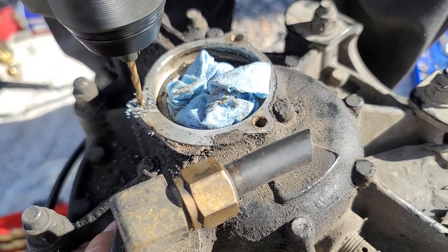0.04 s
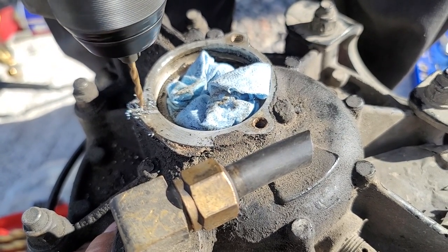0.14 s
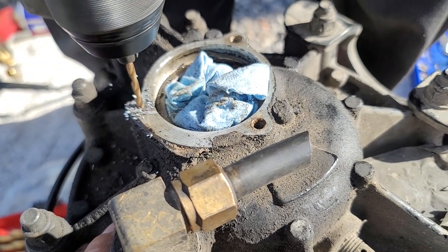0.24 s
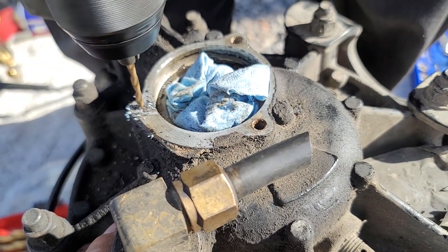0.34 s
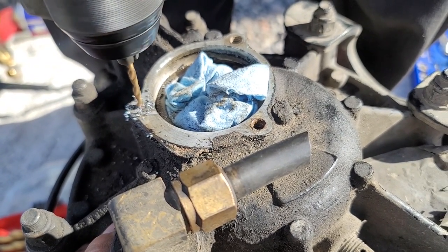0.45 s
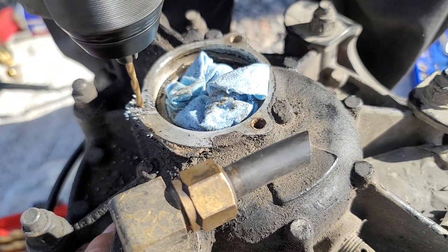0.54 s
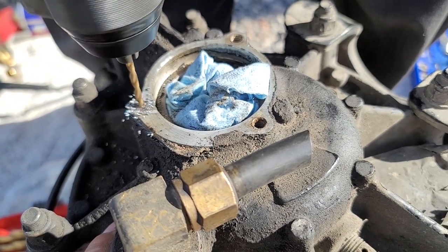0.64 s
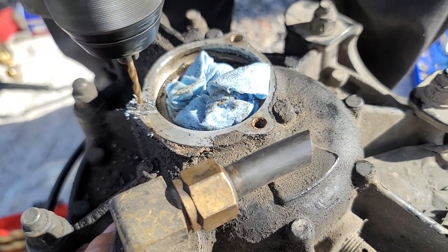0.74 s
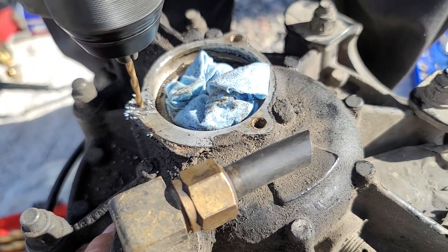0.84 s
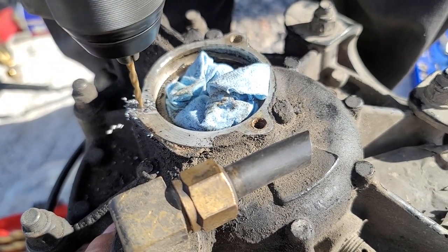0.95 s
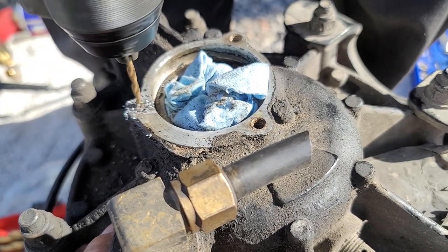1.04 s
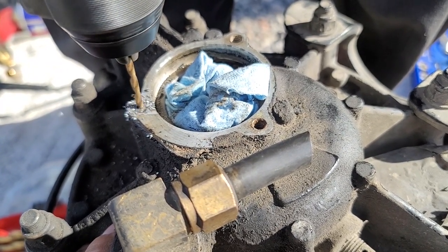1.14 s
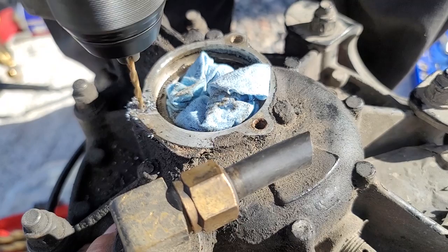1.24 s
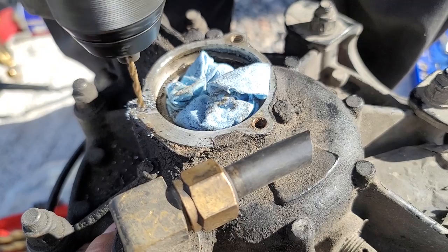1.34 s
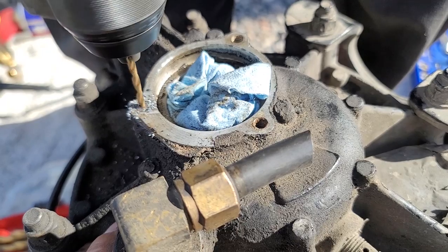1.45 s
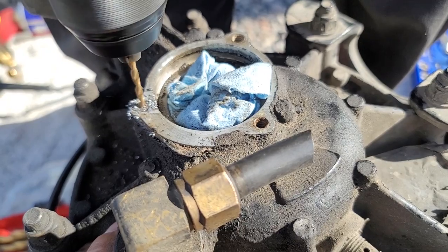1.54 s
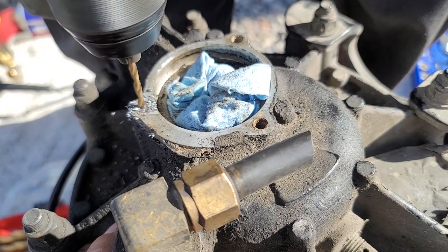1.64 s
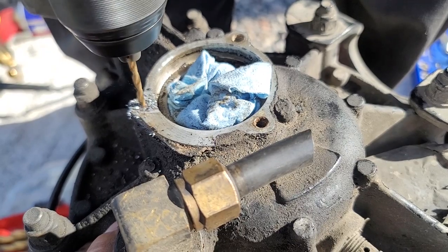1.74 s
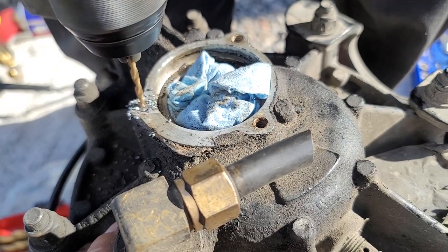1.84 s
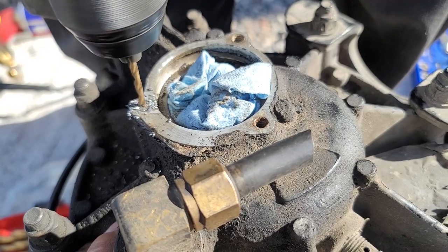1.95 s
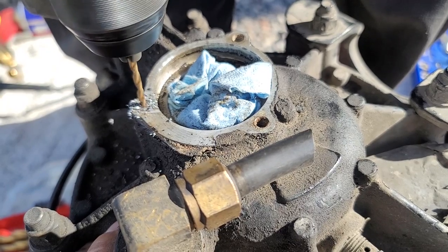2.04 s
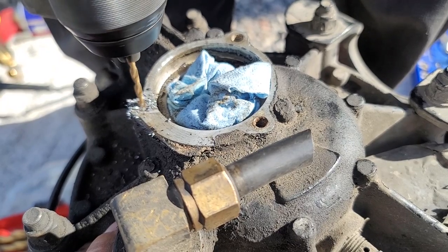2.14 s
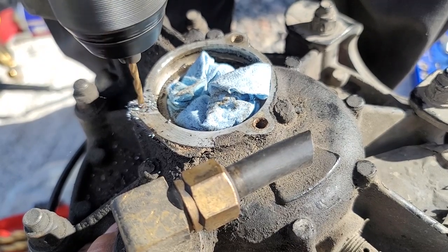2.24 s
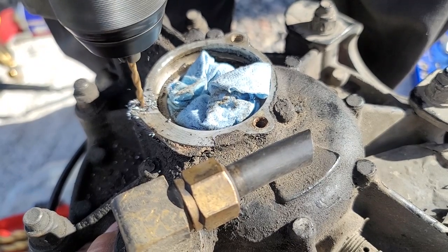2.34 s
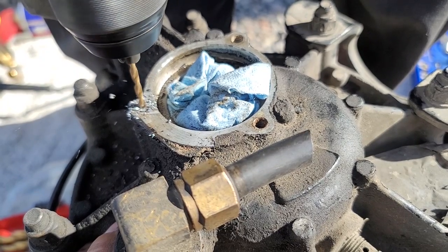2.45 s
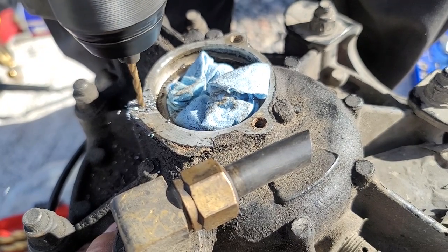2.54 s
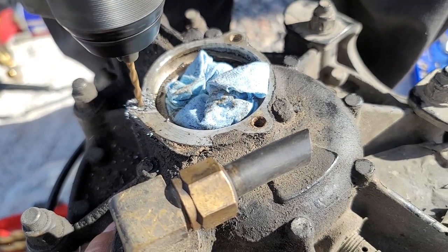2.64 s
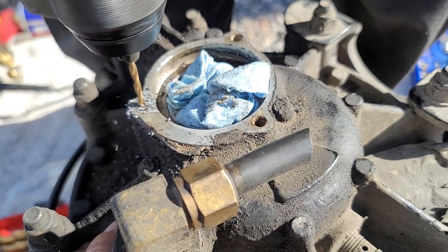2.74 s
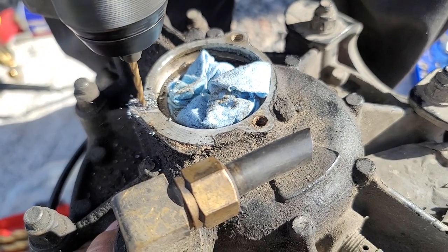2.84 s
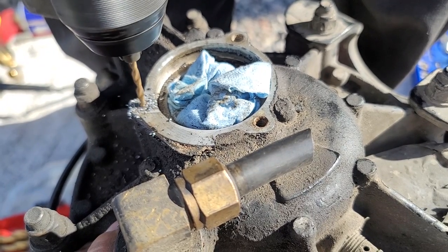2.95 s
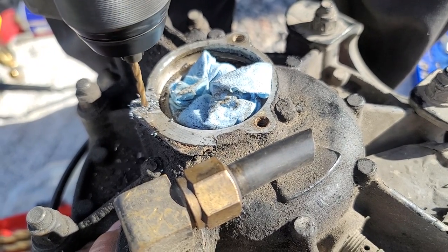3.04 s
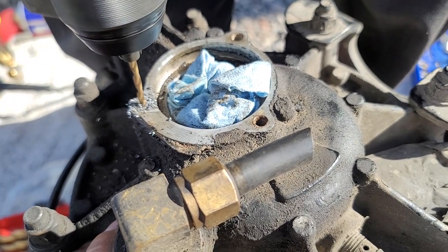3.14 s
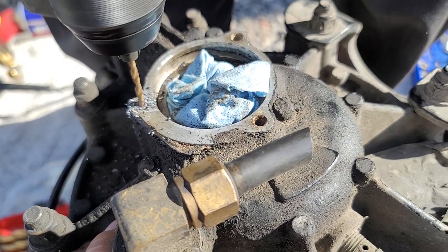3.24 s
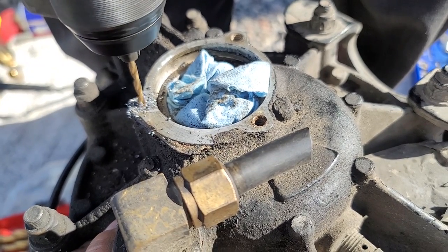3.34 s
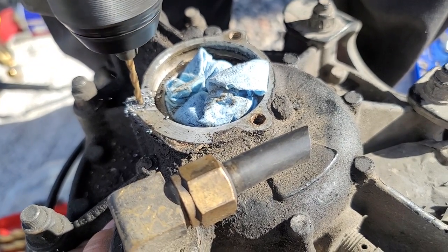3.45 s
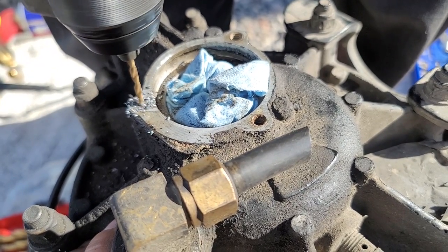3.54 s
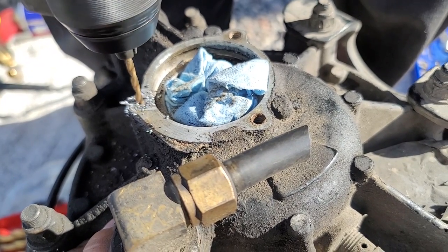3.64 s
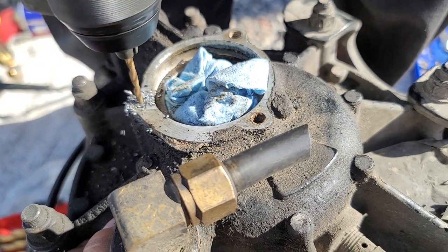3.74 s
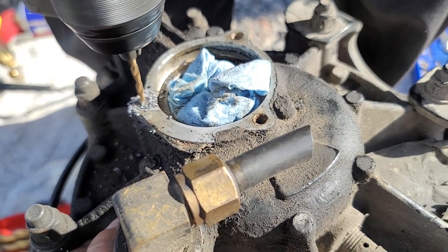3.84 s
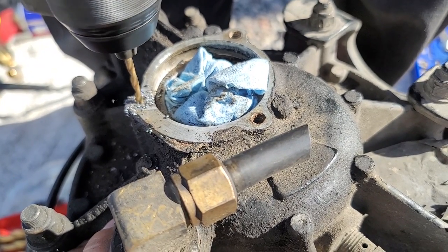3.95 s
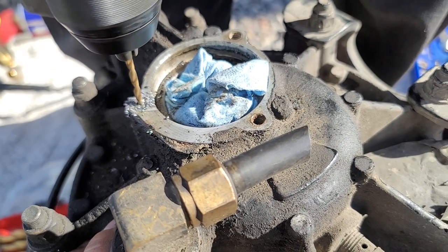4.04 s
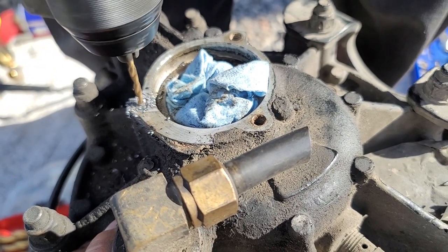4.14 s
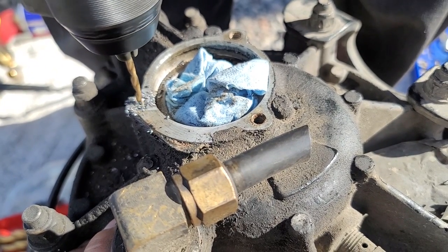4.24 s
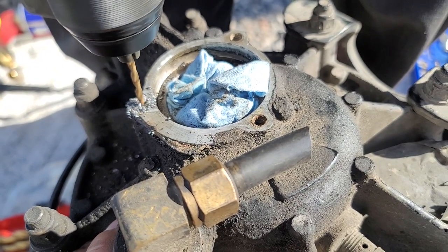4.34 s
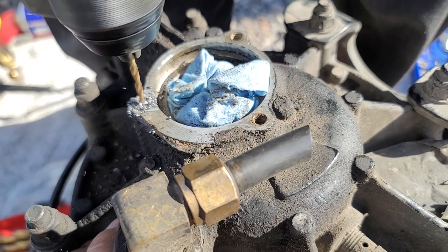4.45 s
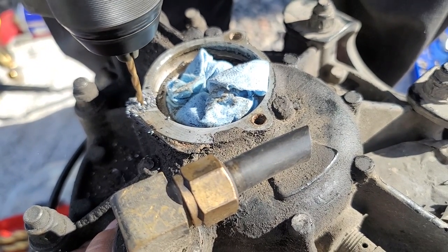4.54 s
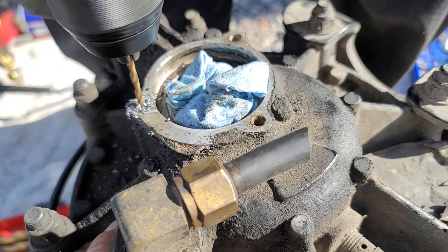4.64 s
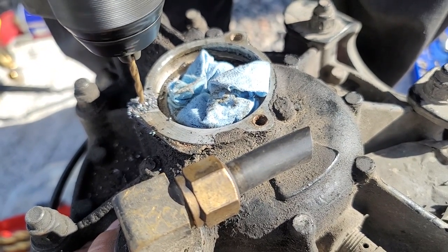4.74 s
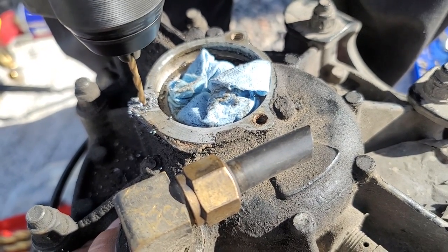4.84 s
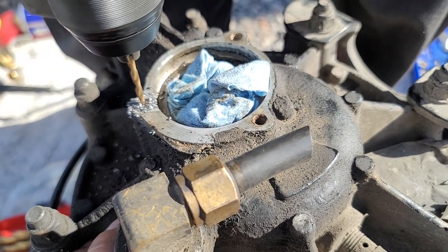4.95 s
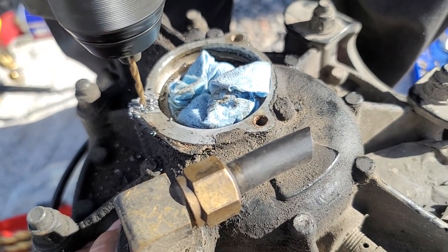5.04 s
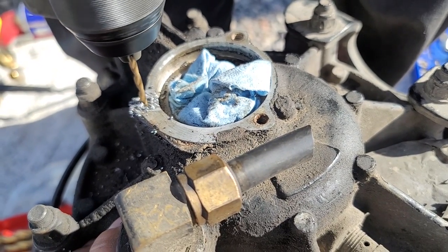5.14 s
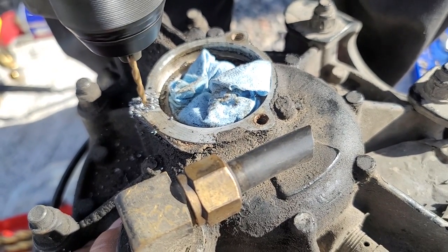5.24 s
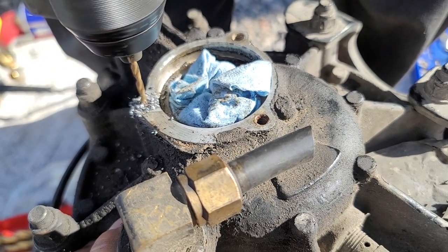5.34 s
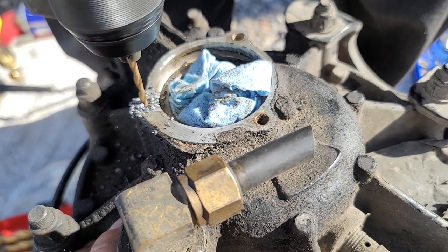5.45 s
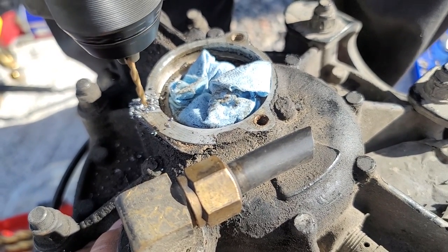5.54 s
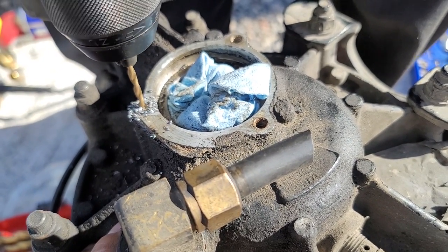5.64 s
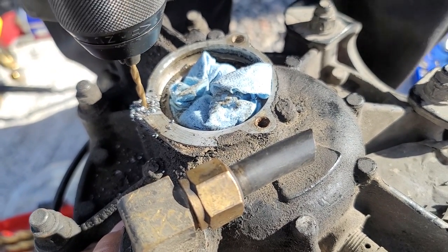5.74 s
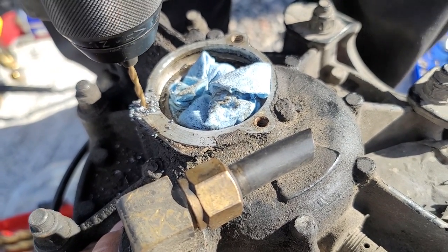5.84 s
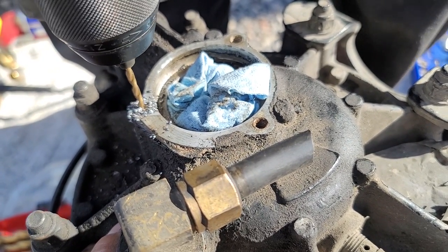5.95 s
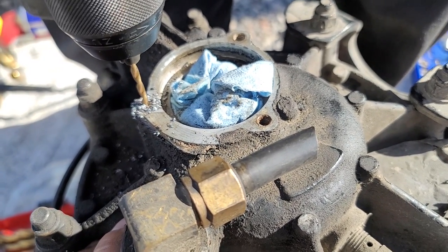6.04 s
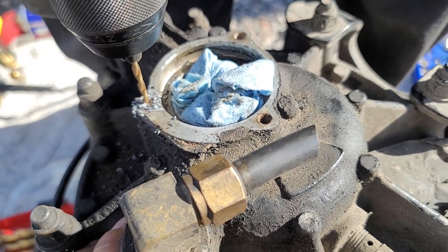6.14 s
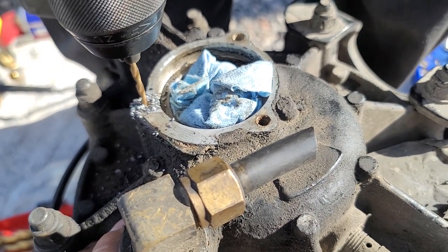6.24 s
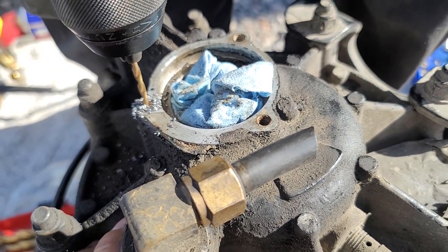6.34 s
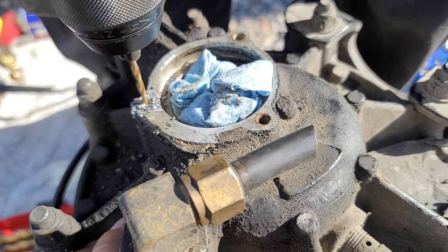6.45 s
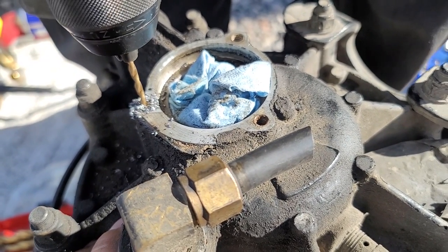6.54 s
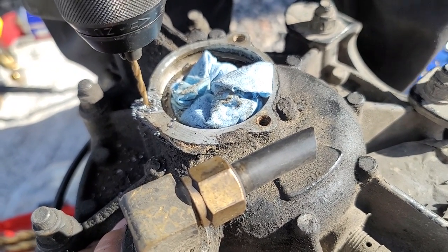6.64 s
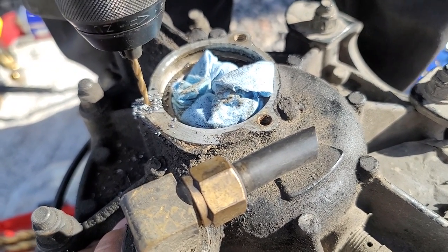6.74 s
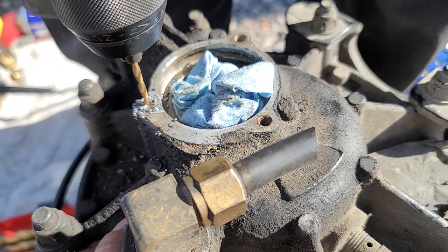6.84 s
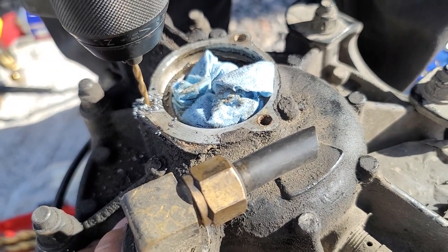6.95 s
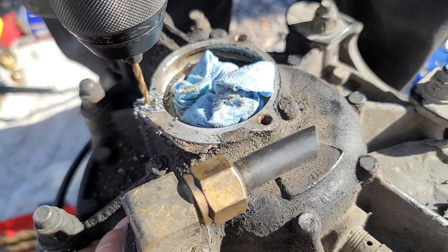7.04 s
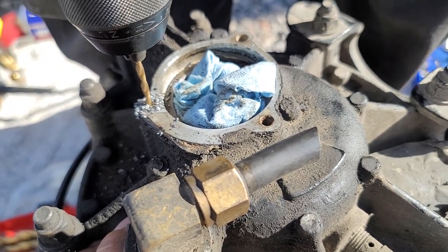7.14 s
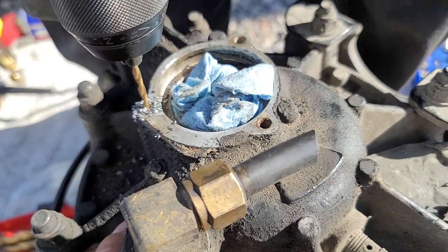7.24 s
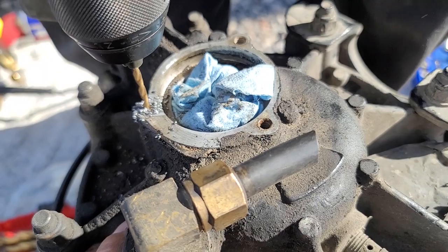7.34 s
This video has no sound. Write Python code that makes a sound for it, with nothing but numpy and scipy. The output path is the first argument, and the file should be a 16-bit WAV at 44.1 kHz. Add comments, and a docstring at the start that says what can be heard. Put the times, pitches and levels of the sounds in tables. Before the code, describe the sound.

Close outdoor drilling into a metal casting: high steady whine and gritty rasp, an abrupt stop, then quiet ticks, a clack and soft rustles.

```python
"""In a yard, a handheld drill bores into a metal casting, close to a two-port microphone.
Its motor hums and whines in shaft-locked sines; noise and grains, shaped in tone, make the rasp.
It brakes to a halt with a howl of the gears and a dying tail. Then come rustles, ticks, a thin squeak,
a jolt and a rub, made of shaped noise, damped modes and a wavering sine.
Behind lie a far idling engine in low sines, and air and gusts in noise."""
import sys
import numpy as np
from scipy import signal
from scipy.fft import rfft, irfft
from scipy.io import wavfile

SR = 44100
rng = np.random.default_rng(int(sys.argv[2]) if len(sys.argv) > 2 else 0)


def int16_out(signal):
    """Quantize to a 16-bit WAV file."""
    q = np.round(np.clip(np.atleast_2d(signal).T, -1, 1) * 32767)
    wavfile.write(sys.argv[1], SR, q.astype(np.int16))


N = 325899
T = np.arange(N) / SR
HZ = np.fft.rfftfreq(N, 1 / SR)


def amp(db):
    """Decibels to gain."""
    return 10 ** (np.asarray(db) / 20)


def unit(x):
    """Scales to rms 1."""
    return x / np.sqrt(np.mean(x ** 2) + 1e-20)


def noise_pair():
    """Independent white noise of rms 1 for each port."""
    return rng.standard_normal((2, N))


def curve(rows):
    """Columns of a time table at every sample."""
    s, *columns = np.transpose(rows)
    return np.array([np.interp(T, s, column) for column in columns])


def shape(rows):
    """Columns of a frequency table at every bin, interpolated over log frequency."""
    hz, *columns = np.transpose(rows)
    return np.array([np.interp(np.log(HZ + 1), np.log(hz), column) for column in columns])


def colour(x, gain):
    """Filters by a gain for every bin."""
    return irfft(rfft(x) * gain, N)


def drift(rate_hz):
    """Random modulation of rms 1: noise low-passed at the given rate."""
    return unit(colour(rng.standard_normal(N), 1 / (1 + (HZ / rate_hz) ** 4)))


def causal(db):
    """Minimum-phase impulse response of energy 1 with the given colour: no sound before its onset."""
    bins_hz = abs(np.fft.fftfreq(4096, 1 / SR))
    log_gain = np.log(amp(np.maximum(np.interp(bins_hz, HZ, db), -90)))
    taps = np.fft.ifft(np.exp(signal.hilbert(log_gain).conj())).real[:2048]
    return taps / np.linalg.norm(taps)


def dying(start_s, t60_s):
    """Envelope that starts at once and falls 60 dB in t60_s."""
    return (T >= start_s) * np.exp(-np.log(1000) * np.maximum(T - start_s, 0) / t60_s)


def stroke(start_s, length_s, db, fade_db_per_s, attack_s, release_s):
    """Envelope that rises, fades slowly while it lasts, then dies away."""
    t = np.maximum(T - start_s, 0)
    rise = np.minimum(t / attack_s, 1)
    fade = amp(db - fade_db_per_s * np.minimum(t, length_s))
    return rise * fade * np.exp(-np.maximum(t - length_s, 0) / release_s)


def swell(middle_s, length_s):
    """Smooth bump of height 1."""
    return np.exp(-(2 * (T - middle_s) / length_s) ** 2)


def tone(turns, left_db, right_db, lead_rad):
    """One partial as the two ports hear it; levels are rms."""
    angle = 2 * np.pi * turns
    left = amp(left_db) * np.sin(angle)
    right = amp(right_db) * np.sin(angle - lead_rad)
    return np.sqrt(2) * np.array([left, right])


# How noise reaches the two ports. Each row: frequency in Hz, likeness 0-1, left lead in rad.
PORT_LIKENESS = [(100, 0.9, -1.5), (495, 0.2, -0.05), (822, .5, 2.5), (1455, 0.82, 2.5), (1680, 0.89, 3.5),
                 (1828, 1, 4), (2020, 0.79, 4), (2550, .9, 4), (2990, 0.75, 4), (3560, .3, 6.5),
                 (4490, .5, 10), (5640, 0.1, 11), (6620, 0.3, 16), (8010, 0.3, 17.5), (12100, 0.35, 17),
                 (15000, 0.4, 16.5)]


def ports(a, b):
    """Two unrelated sounds become a port pair: partly alike, the right one shifted in phase."""
    alike, lead_rad = shape(PORT_LIKENESS)
    alike = np.clip(alike, 0, 1)
    lag = np.exp(-1j * lead_rad)
    right = colour(a, alike * lag) + colour(b, np.sqrt(1 - alike ** 2) * lag)
    return np.array([a, right])


def reflect(pair, echo_db=-16, reach_s=.009, count=16):
    """Metal parts all around throw back early echoes, which comb the sound."""
    taps = np.zeros((2, SR // 20))
    at = (rng.uniform(.1, 1, (2, count)) * reach_s * SR).astype(int)
    np.put_along_axis(taps, at, rng.choice([-1., 1.], at.shape) / np.sqrt(count), 1)
    return pair + amp(echo_db) * signal.oaconvolve(pair, taps, axes=1)[:, :N]


# trigger let go: the motor coasts, then the brake grips; BRAKE_S is a time constant
RELEASE_AT_S, COAST_S, COAST_LOSS_PER_S, BRAKE_S = 5.565, .025, 1.6, .025


def released(delay_s=0):
    """Seconds since the trigger was let go, less a delay; zero before."""
    return np.maximum(T - RELEASE_AT_S - delay_s, 0)


def braking():
    """Share of its speed that the motor keeps: a slow loss in coasting, a steep one under the brake."""
    return np.exp(-COAST_LOSS_PER_S * released() - released(COAST_S) / BRAKE_S)


def running(run_on_s=.038, fall_db_per_s=580):
    """Gain of the gear train: steady, running on for a moment after release, then falling away."""
    return amp(-fall_db_per_s * released(run_on_s))


def strain(lead_s=.009, attack_s=.011, hold_s=.03, fade_db_per_s=60, release_s=.0044):
    """Force of the brake on the gear teeth (0-1)."""
    return stroke(RELEASE_AT_S + COAST_S - lead_s, hold_s, 0, fade_db_per_s, attack_s, release_s)


# The hand leans harder (-) or eases off (+).
# Each row: middle in seconds, length in seconds, change of shaft speed in Hz before braking.
HAND_PUSHES = [(.28, .2, -.5), (2.72, .22, .7), (3.2, .4, -.55), (3.68, .28, .8), (3.9, .06, -1.1),
               (4.27, .1, .7), (4.81, .12, -1.3)]


def shaft(free_hz=346.4, sag_hz=3.8, sag_s=3.7, wobble=.0006, sway=.0005):
    """Turns made by the motor: it sags under the hand, trembles as the bit cuts and sways."""
    speed_hz = free_hz - sag_hz * (1 - np.exp(-T / sag_s))
    speed_hz = speed_hz + sum(hz * swell(middle, length) for middle, length, hz in HAND_PUSHES)
    unsteady = 1 + wobble * drift(28) + sway * drift(8.3)
    return np.cumsum(speed_hz * braking() * unsteady) / SR


# Main whine under load, shifting between the ports as the drill leans.
# Each row: time in seconds, left level in dB, right level in dB, left lead in rad.
WHINE_PATH = [(0, -13.5, -25, .8), (1.3, -13, -22.5, 1.1), (2.8, -14.5, -23, 1.2), (3.05, -15, -20.7, 1),
              (4.6, -15, -18.5, 1.4), (5.55, -15.5, -19.5, 1.5)]


def whine(turns, flutter=.03, buzz=.091, wander_db=.32, fall_s=.007, idle_db=-15):
    """Whine of 14 cycles a turn; without load it collapses at once to a residue."""
    sound = tone(14 * turns, *curve(WHINE_PATH))
    sound = sound * (1 + flutter * drift(40) + buzz * drift(280))
    sound = sound * amp(wander_db * np.array([drift(7), drift(7)]))
    driven = np.maximum(np.exp(-released() / fall_s), amp(idle_db))
    return sound * driven


# Shaft hum (first row) and gear tones (the others).
# Each row: multiple of the shaft, left level in dB, right level in dB, left lead in rad.
SHAFT_TONES = [(1, -34.1, -43.5, .1), (2, -41.7, -43.1, -3.0), (3, -53.7, -54.9, -3.0),
               (4, -42.5, -41.5, 2.9), (7, -31.5, -29.3, -2.2), (16.18, -35, -34, 1.6),
               (17, -33, -36.5, -1.8), (21, -40, -53.7, .1), (22, -47, -56, -1.5), (28, -52, -50, .1)]


def hum(turns):
    """Shaft imbalance sounds once a turn."""
    return tone(turns, *SHAFT_TONES[0][1:])


def gear_tones(turns, flutter=.44):
    """Partials locked to the shaft, each fluttering by itself."""
    return sum(tone(k * turns, *row) * (1 + flutter * drift(30)) for k, *row in SHAFT_TONES[1:])


def howl(turns, level_db=-17, rough=.42, lead_rad=1.74):
    """The gear mesh, 7 a turn, howls roughly while the brake strains it."""
    sound = tone(7 * turns, level_db, level_db, lead_rad)
    return sound * strain() * (1 + rough * drift(400))


def motor(turns):
    """Whine and hum follow the square of speed, as imbalance does; the gears run on, then howl."""
    spin = braking() ** 2
    return (whine(turns) + hum(turns)) * spin + gear_tones(turns) * running() + howl(turns)


# Relative rasp spectrum. Each row: frequency in Hz, left gain in dB, right gain in dB.
RASP_COLOUR = [(59.7, -44, -42.5), (225, -18, -19), (390, -14, -13), (800, -8.5, -15), (1200, -5, -4),
               (1980, -3.5, -4.5), (3000, -5, -5), (4450, -5.5, -6.5), (6560, 0, -1.1), (7550, -8, -12),
               (9660, -16, -18), (11300, -11, -12.5), (15600, -15.5, -11)]
# Peaks (+) and dips (-) in the rasp's tone.
# Each row: frequency in Hz, width in Hz, left gain in dB, right gain in dB.
RASP_PEAKS = [(523, 110, 6, -3), (960, 110, -1.5, -5), (1550, 300, 6, 2.5), (1770, 200, -10.5, -6.5),
              (1980, 220, 3, 3.5), (2530, 210, 6.5, 6), (2740, 750, 9.5, 6.5), (3080, 160, -3.5, 0),
              (3350, 290, 1.5, 1), (3915, 400, 6, 2.5), (4330, 350, -0.5, -3), (4750, 550, 7, 6.5),
              (5080, 120, 4.5, -1), (5340, 280, 3, -3), (5546, 210, 6, 7), (7660, 240, 3.5, 2.5),
              (7970, 180, -4, -6), (8290, 450, 7, -1), (9900, 300, -4, -2), (11000, 500, 3, 1),
              (12140, 350, -4, -3.5), (12520, 330, -2, 2.5), (13780, 750, -1, 3), (14800, 500, 3, 2.5)]


def rasp(turns, level_db=-16.0, grains_per_s=1500, spread_db=3.0, grain_share=.25,
         throb=.055, flicker_db=.54, chuck_db=.14, gear_ratio=20.45,
         load_db=.76, load_rate_hz=14, deepen_db_per_s=.07, brake_db=2.2):
    """Fan air (noise) and tiny impacts of teeth and chips (grains), given echoes, peaks and dips."""
    grains = (rng.random((2, N)) < grains_per_s / SR) * rng.choice([-1, 1], (2, N))
    grains = grains * amp(spread_db * np.minimum(rng.exponential(1, (2, N)), 4))
    drive = np.sqrt(grain_share) * unit(grains) + np.sqrt(1 - grain_share) * noise_pair()
    # rubbing swells once a motor turn and once a chuck turn
    angle = 2 * np.pi * turns
    force = 1 + throb * np.cos(angle)
    force = force * amp(flicker_db * drift(100) + chuck_db * np.sin(angle / gear_ratio))
    peaks_db = sum(np.array([[left], [right]]) / (1 + (2 * (HZ - hz) / width) ** 2)
                   for hz, width, left, right in RASP_PEAKS)
    heard = reflect(ports(*(drive * force)))
    sound = unit(colour(heard, amp(shape(RASP_COLOUR) + peaks_db)))
    # uneven bite, load growing as the hole deepens, brake straining the gears
    bite_db = load_db * drift(load_rate_hz)
    depth_db = deepen_db_per_s * (T - RELEASE_AT_S / 2)
    load = amp(bite_db + depth_db + brake_db * strain())
    return amp(level_db) * sound * load * running()


# Blows of chuck and bit against the hole. Each row: start in seconds, level in dB.
JOLT_BLOWS = [(6.672, -7), (6.6755, -11.5), (6.6794, -12), (6.6825, -15.5), (6.6877, -11.5), (6.692, -17),
              (6.703, -32)]
# Relative jolt spectrum. Each row: frequency in Hz, gain in dB.
JOLT_SPECTRUM = [(88, -51), (150, -17), (361, 1), (514, -5), (1100, -3), (1290, -13), (1450, -3),
                 (2020, -5.5), (2220, -8), (3220, -3), (4950, -5), (5460, -1), (9440, -16), (14200, -16),
                 (16000, -27)]
# Jolt balance, before each port is scaled to equal energy.
# Each row: frequency in Hz, left minus right in dB.
JOLT_BALANCE = [(60, 5), (110, 0), (200, 1.5), (380, -3), (700, 4), (1290, -9), (2380, -1), (4400, -6),
                (8120, 2), (15000, -20)]


def blows(t60_s):
    """Noise bursts, one a blow, added in power."""
    power = sum((amp(db) * dying(start, t60_s)) ** 2 for start, db in JOLT_BLOWS)
    return np.sqrt(power) * noise_pair()


def wind_up(length_s=.021, end_db=-19.5, rise_db_per_s=1050, centre_hz=5600):
    """A short trigger blip winds the motor up ever louder until the first blow: band noise on a rising
    envelope."""
    early_s = JOLT_BLOWS[0][0] - T
    chatter = (early_s > 0) * (early_s < length_s) * amp(end_db - rise_db_per_s * abs(early_s))
    band = 1 / (1 + (HZ / centre_hz - centre_hz / (HZ + 1)) ** 2)
    return unit(colour(noise_pair(), band)) * chatter


def snap(level_db=-9, t60_s=.014, edge_hz=7000):
    """At the first blow steel meets steel: a bright high-passed burst."""
    bright = unit(colour(noise_pair(), HZ / np.hypot(HZ, edge_hz)))
    return amp(level_db) * bright * dying(JOLT_BLOWS[0][0], t60_s)


def jolt(crack_t60_s=.019, grit_db=3.0, ring_db=-12, ring_t60_s=.085,
         tail_db=-29, tail_t60_s=.19, ring_edge_hz=5500):
    """The gear train takes up its slack in a quick rattle; the housing rings, the surroundings answer."""
    ring = amp(ring_db) * blows(ring_t60_s) + amp(tail_db) * blows(tail_t60_s)
    ring = colour(ring, 1 / np.sqrt(1 + (HZ / ring_edge_hz) ** 4))
    crack = blows(crack_t60_s) * unit(amp(grit_db * drift(900)))
    ports_db = shape(JOLT_SPECTRUM) + np.array([[.5], [-.5]]) * shape(JOLT_BALANCE)
    rattle = np.array([signal.oaconvolve(x, causal(db))[:N]
                       for x, db in zip(reflect(crack + ring), ports_db)])
    return wind_up() + rattle + snap()


# Light ticks of the resting bit.
# Each row: start in seconds, level in dB before the share is applied, share of dull knock 0-1.
BIT_TICKS = [(5.708, -46, 0.5), (5.716, -43, 0.5), (5.782, -45, 0.65), (5.945, -52, .9), (6.165, -56, .3),
             (6.309, -46, .1), (6.596, -57.5, .02), (6.608, -58, .02), (6.897, -42, 0.15), (7.224, -54, .5),
             (7.246, -39.5, .95)]
# Damped modes of the bit. Each row: frequency in Hz, relative level in dB, t60 in seconds.
BIT_MODES = [(2780, -2, 0.011), (3420, -1, .008), (4500, 1, .005), (5720, -1, .009), (6800, 1, .009),
             (7810, -7, .008), (11500, -14, .004)]


def ticks(contact_t60_s=.022, knock_t60_s=.014, knock_hz=1800):
    """Brief scrapes of the bit ring its damped modes; the duller ones knock on the casting."""
    t = T[:SR // 10]
    ring = sum(amp(db - 60 * t / t60) * np.sin(2 * np.pi * hz * t) for hz, db, t60 in BIT_MODES)
    ring = ring / np.linalg.norm(ring)
    thud = causal(-10 * np.log10(1 + (HZ / knock_hz) ** 2))
    scrape = sum(amp(db) * (1 - dull) * dying(start, contact_t60_s) for start, db, dull in BIT_TICKS)
    knock = sum(amp(db) * dull * dying(start, knock_t60_s) for start, db, dull in BIT_TICKS)
    bright_sound = signal.oaconvolve(scrape * noise_pair(), ring[None])[:, :N]
    dull_sound = signal.oaconvolve(knock * noise_pair(), thud[None])[:, :N]
    return bright_sound + dull_sound


def rub(start_s=7.248, length_s=.076, level_db=-54.5, fade_db_per_s=70, mode_hz=3250, width_hz=230,
        upper_hz=4250, upper_db=-8, slip_db=4, scrape_db=-18, scrape_hz=5000):
    """The bit rubs on the rim of the hole: uneven slips scrape and keep two of its modes singing."""
    slips = noise_pair() * amp(slip_db * drift(150))
    modes = sum(amp(db) / (1 + (2 * (HZ - hz) / width_hz) ** 2)
                for hz, db in [(mode_hz, 0), (upper_hz, upper_db)])
    scrape = amp(scrape_db) / (1 + (2 * (HZ / scrape_hz - 1)) ** 4)
    envelope = stroke(start_s, length_s, level_db, fade_db_per_s, attack_s=.008, release_s=.006)
    return unit(colour(slips, modes + scrape)) * envelope


def squeak(start_s=5.735, length_s=.385, level_db=-67, end_hz=11350, top_hz=12050,
           waver=.014, fuzz=.022, flicker_db=4.5, attack_s=.02, release_s=.03):
    """A faint, fuzzy whistle high in the treble, its mean pitch one arch."""
    progress = np.clip((T - start_s) / (length_s + 2 * release_s), 0, 1)
    arch = np.sin(np.pi * progress ** 1.4)
    hz = (end_hz + (top_hz - end_hz) * arch) * (1 + waver * drift(45))
    pair = np.array([np.sin(2 * np.pi * np.cumsum(hz * (1 + fuzz * drift(600))) / SR) for _ in range(2)])
    envelope = stroke(start_s, length_s, level_db, 0, attack_s, release_s)
    return unit(pair) * amp(flicker_db * drift(20)) * envelope


# Soft noise: first the drill's last sound dying away in the yard, then rustles.
# Each row: start in seconds, length in seconds, level in dB, fade in dB per second.
TAIL_AND_RUSTLES = [(5.62, 0.13, -51, 118), (5.776, .45, -55.5, 33), (6.95, .44, -66.5, 2),
                    (7.061, 0.25, -59, 8)]
# Relative spectrum of the soft noise. Each row: frequency in Hz, gain in dB.
SOFT_SPECTRUM = [(200, -19), (600, 1), (1500, -4.5), (3000, -7.5), (4500, -9), (6600, -5.5), (8500, -18),
                 (12000, -16), (16000, -23)]


def tail_and_rustles(grain_db=1.0, attack_s=.012, release_s=.025):
    """Crinkled, coloured noise under envelopes added in power."""
    crinkle = noise_pair() * amp(grain_db * drift(200))
    power = sum(stroke(*row, attack_s, release_s) ** 2 for row in TAIL_AND_RUSTLES)
    return unit(colour(crinkle, amp(shape(SOFT_SPECTRUM)))) * np.sqrt(power)


# Far engine. Each row: frequency in Hz, level in dB.
ENGINE_TONES = [(58.5, -45), (70, -44), (81.6, -45.5), (128.3, -57), (140, -53)]


def engine(phase_waver_rad=.25, level_waver=.25):
    """Low sines idle far off, each wavering in phase and level."""
    idle = 0
    for hz, db in ENGINE_TONES:
        angle = 2 * np.pi * (hz * T + rng.random()) + phase_waver_rad * drift(1.5)
        idle = idle + np.sqrt(2) * amp(db) * (1 + level_waver * drift(2.3)) * np.sin(angle)
    return idle


# Gusts on the microphone.
# Each row: middle in seconds, length in seconds, level in dB before the port gains.
WIND_GUSTS = [(.24, .1, -31), (1.05, .65, -28.5), (1.95, .45, -31), (2.65, .6, -30), (3.9, .55, -32.5),
              (7.01, .06, -31), (7.2, .12, -33.5)]


def wind(breeze_db=-49, left_gain_db=-7, right_gain_db=1, centre_hz=62, edge_hz=135):
    """Low band noise on the ports: gusts swell over a steady breeze."""
    band = 1 / np.sqrt(1 + (1.5 * (HZ / centre_hz - centre_hz / (HZ + 1))) ** 2)
    band = band / np.sqrt(1 + (HZ / edge_hz) ** 4)
    gust_power = sum(amp(db) ** 2 * swell(middle, length) for middle, length, db in WIND_GUSTS)
    level = np.sqrt(amp(breeze_db) ** 2 + gust_power)
    return unit(colour(noise_pair(), band)) * level * amp([[left_gain_db], [right_gain_db]])


# Relative spectrum of the outdoor background. Each row: frequency in Hz, gain in dB.
AIR_COLOUR = [(15, -14.5), (40, -12), (100, -0.5), (190, -7), (290, -16), (500, -25), (800, -27.5),
              (1300, -29.5), (1650, -31.5), (2500, -39.5), (4000, -42), (5600, -48), (6900, -48.5),
              (8300, -57.5), (16000, -62.5)]


def air(level_db=-46):
    """Soft, steady outdoor noise, partly alike at the ports."""
    return amp(level_db) * unit(colour(ports(*noise_pair()), amp(shape(AIR_COLOUR))))


def scene():
    """The drill, the small noises after it and the yard around it."""
    turns = shaft()
    drill = motor(turns) + rasp(turns)
    afterwards = jolt() + ticks() + rub() + squeak() + tail_and_rustles()
    return drill + afterwards + engine() + wind() + air()


def record(dry, edge_hz=15760):
    """Clips at full scale, then low-passes steeply."""
    low_pass = signal.firwin(511, edge_hz, window=("kaiser", 9), fs=SR)
    return signal.oaconvolve(np.clip(dry, -1, 1), low_pass[None], "same")


dry = scene()
out = record(dry)
int16_out(out)
```